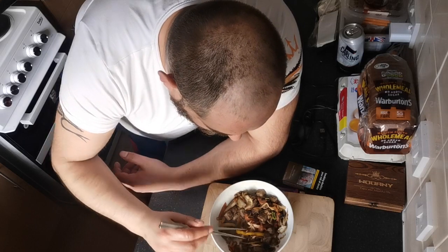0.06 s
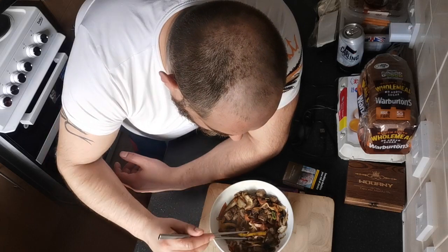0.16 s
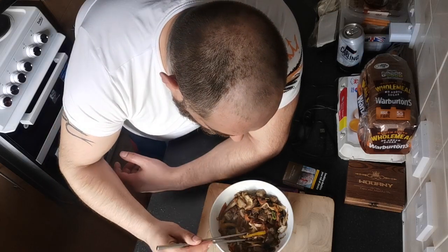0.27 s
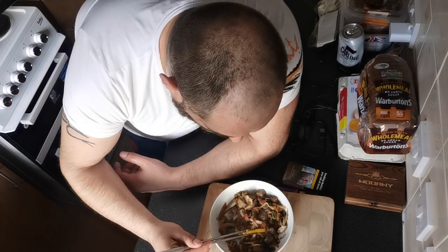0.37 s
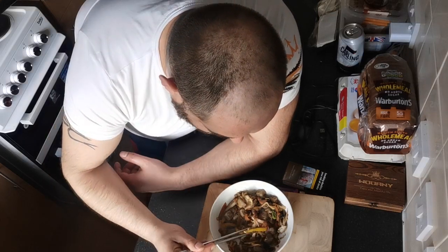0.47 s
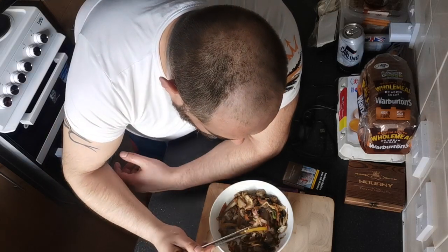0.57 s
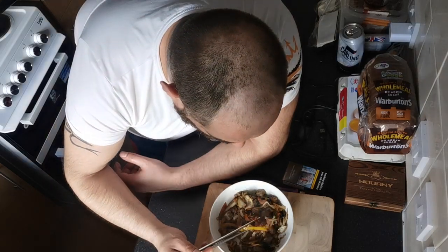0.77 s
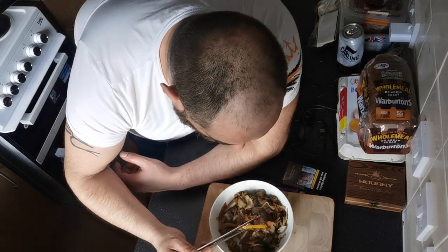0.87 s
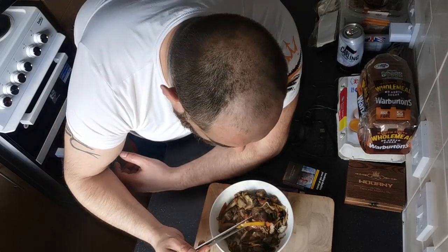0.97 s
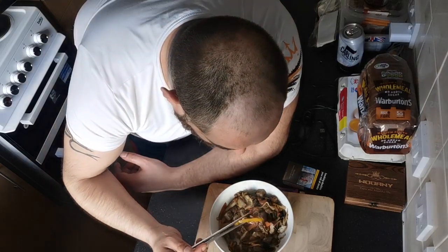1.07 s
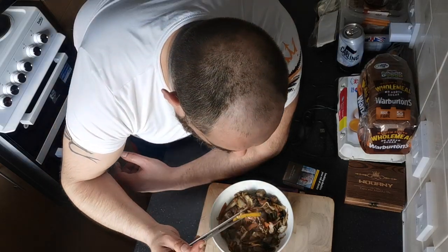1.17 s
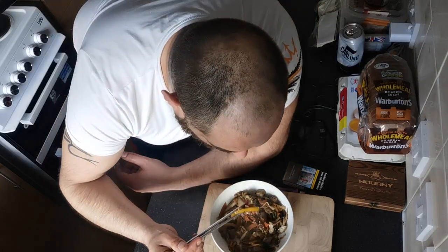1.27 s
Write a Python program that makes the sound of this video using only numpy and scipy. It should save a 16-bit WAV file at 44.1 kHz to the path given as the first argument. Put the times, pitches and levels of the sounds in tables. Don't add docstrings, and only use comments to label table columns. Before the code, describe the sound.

A chopstick strikes a ceramic bowl with a bright, short double clink, then very quiet wet stirring and tiny knocks in noodles, in a small hard kitchen, close stereo microphone with faint hum and hiss.

```python
import sys
import numpy as np
from scipy import signal
from scipy.fft import rfft, irfft
from scipy.io import wavfile
from scipy.ndimage import uniform_filter1d

SR = 44100
rng = np.random.default_rng(int(sys.argv[2]) if len(sys.argv) > 2 else 0)


def output_pcm(signal):
    pcm = np.clip(np.atleast_2d(signal).T, -1, 1) * 32767
    wavfile.write(sys.argv[1], SR, np.round(pcm).astype(np.int16))


def amplitude_ratio(level_db):
    exponent = np.asarray(level_db, float) / 20
    return 10 ** exponent


N = 57330


def evened(x):
    return x / np.sqrt(np.mean(x ** 2) + 1e-20)


def read(points, hz):
    f, value = np.transpose(points)
    return np.interp(np.log(hz + 1), np.log(f + 1), value)


def curve(points, column=1):
    rows = np.transpose(points)
    return np.interp(np.arange(N) / SR, rows[0], rows[column])


def add(mix, start_s, sound):
    part = mix[round(start_s * SR):][:len(sound)]
    part += sound[:len(part)]


def colour(x, points, sign=1):
    hz = np.fft.rfftfreq(N, 1 / SR)
    return irfft(rfft(x) * amplitude_ratio(sign * read(points, hz)), N)


def ports(pair, points):
    left = colour(pair[0], points, 0.5)
    right = colour(pair[1], points, -0.5)
    return np.array([left, right])


def resonate(x, hz, width):
    turn = np.exp(2j * np.pi * hz * np.arange(x.shape[-1]) / SR)
    r = np.exp(-np.pi * width / SR)
    return 2 * (turn * signal.lfilter([1 - r], [1, -r], x / turn)).real


# pitch_hz, t60_s
ROOM_T60 = [(200, 0.51), (1000, 0.34), (3000, 0.33), (6000, 0.34), (9000, 0.27), (14000, 0.31)]


def room(x):
    build_up_s, spacing = 0.0046, 16
    taps = np.zeros((2, SR // 2))
    slots = np.arange(0, SR // 2 - spacing, spacing)
    at = slots + rng.integers(0, spacing, (2, len(slots)))
    np.put_along_axis(taps, at, rng.choice([-1., 1.], at.shape), 1)
    hz, t, z = signal.stft(taps, SR, nperseg=128)
    decay = amplitude_ratio(-60 * t / read(ROOM_T60, hz)[:, None])
    tail = signal.istft(z * decay, SR, nperseg=128)[1]
    tail = tail * (1 - np.exp(-np.arange(tail.shape[1]) / SR / build_up_s))
    return signal.fftconvolve(x[None], tail / np.linalg.norm(tail[0]), axes=1)[:, :N]


def heard(x, room_db, lag_s):
    delay = np.exp(-2j * np.pi * np.fft.rfftfreq(N, 1 / SR) * lag_s)
    late = irfft(rfft(x) * delay, N)
    return np.array([x, late]) + amplitude_ratio(room_db) * room(x)


# start_s, level_db, bounce_share (0 blow colour, 1 bounce colour)
BLOWS = [
    (.2004, -34.5, 0),
    (0.2013, -26, 0),
    (0.217, -27.5, 0.99),
    (0.2188, -31, 0.87),
    (.2200, -31.5, 0.9),
    (0.221, -31.5, 0.87),
    (0.408, -57, 0),
    (.497, -60, 0.1),
]
# blow_db, bounce_db, t60_s
BOWL_MODES = [(-6.5, -23, 0.018), (-2.5, -7.5, 0.021), (-4, -6, 0.066), (-9, -9, 0.045), (-3, -22, 0.023),
              (-6, -21.5, .02), (-7, -8.5, 0.019), (0.5, -3.5, .022), (-8, -0.5, 0.029), (-14, -4.5, 0.024),
              (-16, -12, 0.035), (-5, -3, 0.03), (-16, -6, 0.031), (-32, -11.5, 0.026)]
BOWL_HZ = [2840, 3445, 3730, 4040, 4395, 4750, 5750, 6030, 6150, 6330, 6560, 9050, 11300, 13350]
# blow_db, bounce_db, t60_s
STICK_MODES = [(-12.5, -24.5, 0.022), (-4, -20, 0.0079), (-8, -10, 0.011), (-5, -19.5, 0.023),
               (-2.5, -8, 0.015), (-15, -8.5, 0.012), (-22, -21, 0.024), (-12.5, -11.5, 0.024),
               (-17, -14, 0.02), (-17, -14, 0.02), (-26, -27, 0.0092), (-18.5, -12, 0.014), (-24, -32, .01)]
STICK_HZ = [2400, 2620, 4200, 4570, 5250, 7150, 7700, 8200, 10550, 12720, 14300, 9860, 15450]
# blow_db, bounce_db, t60_s
BOARD_MODES = [(-28, -66, 0.026), (-37.5, -39, 0.067), (-13, -25, 0.035), (-13.5, -20, 0.035),
               (-12, -23.5, 0.009)]
BOARD_HZ = [125, 900, 1105, 1250, 1480]
# pitch_hz, level_db
TICK_COLOUR = [(1500, -13.5), (2600, -13), (3500, -0.5), (5000, -5.5), (6200, -6), (9000, -1.5),
               (13000, -6.5), (16200, -20)]
# pitch_hz, left_minus_right_db
BLOW_PORTS = [(60, 5), (150, -10), (380, -13), (950, 7.5), (2380, 0.5), (5980, -1), (15000, 14)]


def bowl():
    contact_s, split, twin_gain = 0.00026, 0.009, 0.6
    tick_db, tick_bounce_db, tick_t60_s = -4.5, 3, 0.018
    rings, ticks = np.zeros(N), np.zeros(N)
    t = np.arange(SR // 5) / SR
    hz = np.array([*BOWL_HZ, *STICK_HZ, *BOARD_HZ])[:, None]
    modes = [*BOWL_MODES, *STICK_MODES, *BOARD_MODES]
    blow_db, bounce_db, t60_s = np.transpose(modes)[:, :, None]
    twin_hz = hz * (1 + split * rng.uniform(-1, 1, hz.shape))
    waves = np.sin(2 * np.pi * hz * t) + twin_gain * np.sin(2 * np.pi * twin_hz * t)
    crack = evened(colour(rng.standard_normal(N), TICK_COLOUR))
    for start_s, level_db, bounce in BLOWS:
        side = rng.choice([-1., 1.], hz.shape)
        onset = amplitude_ratio(level_db) * (1 - np.exp(-t / contact_s))
        mode_db = blow_db + bounce * (bounce_db - blow_db) - 60 * t / t60_s
        add(rings, start_s, onset * (amplitude_ratio(mode_db) * side * waves).sum(0))
        fade = amplitude_ratio(tick_db + bounce * tick_bounce_db - 60 * t / tick_t60_s)
        noise = np.roll(crack, -round(start_s * SR))[:len(t)]
        add(ticks, start_s, onset * fade * noise)
    null = signal.iirnotch(3090, 13, SR)
    direct = signal.lfilter(*null, signal.lfilter(*null, rings + ticks))
    direct = signal.lfilter(*signal.iirnotch(1750, 7, SR), direct)
    return ports(heard(direct, room_db=-0.5, lag_s=0.00029), BLOW_PORTS)


# pitch_hz, width_hz, level_db
BOOM = [(130, 36, -78), (201, 55, -61.5), (251, 39, -59), (372.7, 9.4, -54), (412.5, 29, -61),
        (503, 13, -65.5)]


def boom():
    rise_s, hold_s, fall_s, spread = 0.0053, 0.088, 0.036, 0.37
    t = np.maximum(np.arange(N) / SR - BLOWS[0][0], 0)
    shape = (1 - np.exp(-t / rise_s)) * np.exp(-np.maximum(t - hold_s, 0) / fall_s)
    middle, side = rng.standard_normal((2, N))
    shake = middle + spread * side * [[1], [-1]]
    out = np.zeros((2, N))
    for hz, width, level_db in BOOM:
        out += amplitude_ratio(level_db) * evened(resonate(resonate(shake, hz, width), hz, 2 * width))
    return shape * out


# start_s, level_db, pitch_hz, length_s
TOUCHES = [(0.112, -63.5, 377, 0.011), (0.108, -69, 680, 0.017), (0.148, -65.5, 380, 0.04),
           (0.647, -73.5, 1954, 0.11), (0.678, -68, 1970, 0.018), (0.692, -66, 1063, 0.029),
           (0.79, -65, 2060, 0.011), (0.905, -67, 1460, 0.025), (0.984, -72, 1620, 0.038),
           (1.086, -67, 393, 0.05), (1.085, -67.5, 266, 0.031), (1.09, -72, 740, 0.024),
           (0.405, -69.5, 1470, 0.016), (0.962, -73, 3130, 0.018), (1.11, -69, 1140, 0.041),
           (0.63, -75.5, 392, 0.11), (1.245, -70, 2280, 0.038), (1.258, -73, 2250, 0.019)]


def knocks():
    q, wide_db, rise_s = 7, -6, 0.00097
    out = np.zeros(N)
    t = np.arange(SR // 10) / SR
    for start_s, level_db, hz, length_s in TOUCHES:
        noise = rng.standard_normal(len(t))
        body = evened(resonate(resonate(noise, hz, hz / q), hz, hz / q))
        body = body + amplitude_ratio(wide_db) * evened(resonate(noise, hz, hz))
        envelope = np.minimum(t / rise_s, 1) * np.exp(-(t / length_s) ** 2)
        add(out, start_s, amplitude_ratio(level_db) * envelope * body)
    return out


# multiple, level_db
SQUEAK = [(1, -60), (2, -53), (4, -59)]


def squeak():
    start_s, length_s, pitch_hz, level_db = 0.961, 0.019, 748, -1.5
    out = np.zeros(N)
    t = np.arange(0, length_s, 1 / SR)
    wobble = evened(uniform_filter1d(rng.standard_normal(len(t)), size=120))
    turns = pitch_hz * t + 0.04 * wobble
    tone = sum(amplitude_ratio(db + level_db) * np.sin(2 * np.pi * k * turns) for k, db in SQUEAK)
    add(out, start_s, np.sin(np.pi * t / length_s) * tone)
    return out


# start_s, level_db
STIR = [(0.45, -61), (0.602, -73), (0.65, -59.5), (0.698, -52.5), (0.754, -65), (0.98, -58), (1.062, -92),
        (1.094, -54.5), (1.282, -70.5), (1.3, -76)]
# pitch_hz, level_db
WET = [(150, -29), (400, -6.5), (1100, -7.5), (2200, -3.5), (3200, -9.5), (5000, -5), (7000, -25),
       (12000, -16.5)]


def stirring():
    level_db, grains_per_s, grain_db = -9.5, 1800, 3
    sizes = amplitude_ratio(grain_db * np.minimum(rng.exponential(1, N), 2))
    struck = rng.random(N) < grains_per_s / SR
    grains = sizes * struck * rng.standard_normal(N)
    effort_db = curve([(0, -65), (0.4, -61)] + list(STIR))
    return evened(colour(grains, WET)) * amplitude_ratio(effort_db + level_db)


# start_s, level_db
RUSTLE = [(.3, -63), (.42, -63.5), (.55, -67), (.8, -69.5), (.9, -57.5), (1.02, -61), (1.1, -71.5),
          (1.3, -105)]


def rustle():
    return evened(resonate(rng.standard_normal(N), 5400, 2100)) * amplitude_ratio(curve(RUSTLE))


# pitch_hz, left_minus_right_db
PORTS = [(60, -6), (150, -4), (380, 2), (950, 3), (2380, 3.5), (5980, 0), (15000, 14.5)]


def food():
    sounds = knocks() + squeak() + stirring() + rustle()
    return ports(heard(sounds, room_db=-7, lag_s=0.00005), PORTS)


# start_s, pitch_hz, level_db
HUM = [(0.0, 50.6, -63.5), (0.082, 50.2, -70.5), (0.13, 48.2, -62), (0.206, 48.3, -69), (0.212, 50.2, -66),
       (0.266, 49.9, -59), (0.292, 48.3, -64), (0.314, 47.4, -70), (0.376, 49.56, -62.5),
       (0.514, 48.33, -65.5), (0.846, 50.15, -64), (0.876, 49.4, -69), (0.93, 49.56, -61.5),
       (1.198, 48.9, -64.5), (1.23, 47.5, -60), (1.3, 48.3, -64)]


def hum():
    turns = 2 * np.pi * np.cumsum(curve(HUM)) / SR
    tone = np.sin(turns) + amplitude_ratio(-16) * np.sin(2 * turns + 1)
    port_gain = amplitude_ratio([[-0.8], [0.8]])
    return np.sqrt(2) * amplitude_ratio(curve(HUM, column=2)) * tone * port_gain


# pitch_hz, density_db (per Hz)
LOWS = [(15, -15), (25, -5.5), (54, -9), (152, -10), (213, -12), (397, -15), (902, -17), (3000, -23),
        (3900, -34), (6600, -120)]
# pitch_hz, density_db (per Hz)
HISS = [(1760, -21), (3000, -13), (4150, -7.5), (4360, -12), (5270, -6.5), (6790, -5.5), (7760, -13),
        (12400, -8.5), (16100, -19)]
# pitch_hz, width_hz, level_db
WHISTLES = [(402, 6.6, -86.5), (4525, 51, -73.5), (4980, 32, -78), (6820, 78, -79.5), (10740, 400, -79.5)]
# pitch_hz, likeness (-1 to 1)
SAME = [(60, 0.74), (180, 0.85), (550, 0.33), (1650, -0.79), (4970, 0.15), (15000, 0.15)]


def hiss():
    lows_db, hiss_db = -70, -63
    a, b = rfft(rng.standard_normal((2, N)))
    same = np.clip(read(SAME, np.fft.rfftfreq(N, 1 / SR)), -1, 1)
    pair = irfft(np.array([a, same * a + np.sqrt(1 - same ** 2) * b]), N)
    out = amplitude_ratio(lows_db) * evened(colour(pair, LOWS))
    out = out + amplitude_ratio(hiss_db) * evened(colour(pair, HISS))
    for hz, width, level_db in WHISTLES:
        out = out + amplitude_ratio(level_db) * evened(resonate(pair, hz, width))
    return ports(out, PORTS)


def scene():
    return bowl() + boom() + food() + hum() + hiss()


def top_cut(x):
    return signal.sosfilt(signal.butter(12, 15950, fs=SR, output="sos"), x)


def record(dry):
    edge = signal.firwin(601, 16000, window=("kaiser", 9), fs=SR)
    mix = signal.oaconvolve(dry, edge[None], "same")
    return top_cut(mix)


dry = scene()
out = record(dry)
output_pcm(out)
```